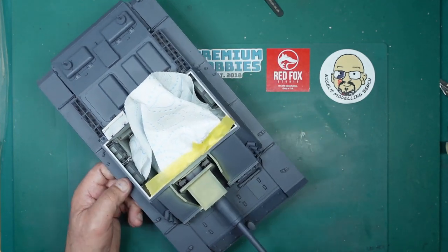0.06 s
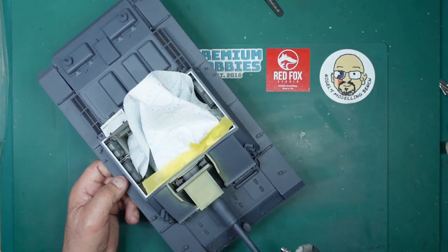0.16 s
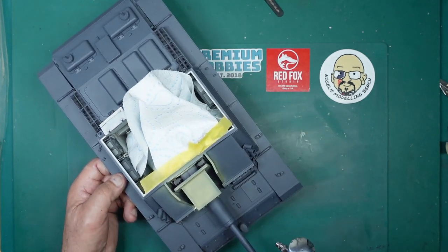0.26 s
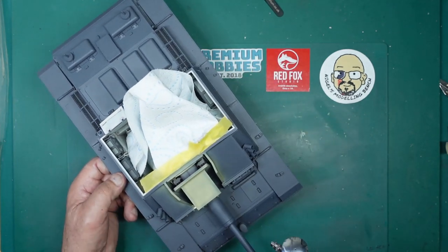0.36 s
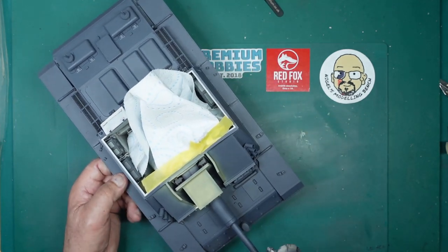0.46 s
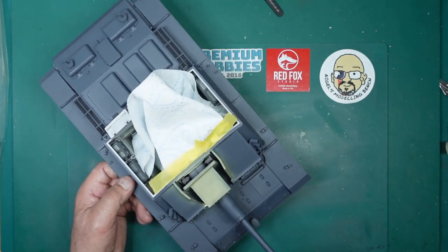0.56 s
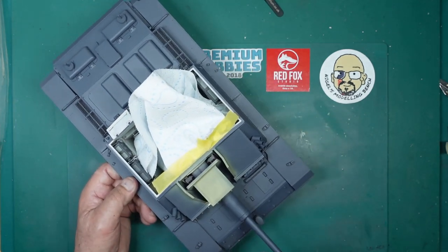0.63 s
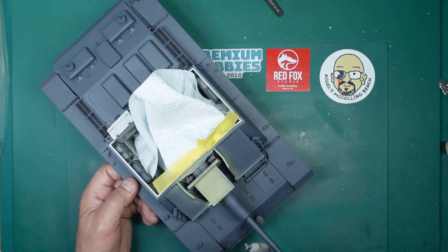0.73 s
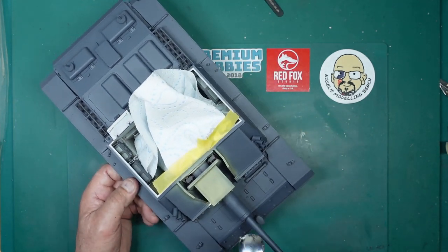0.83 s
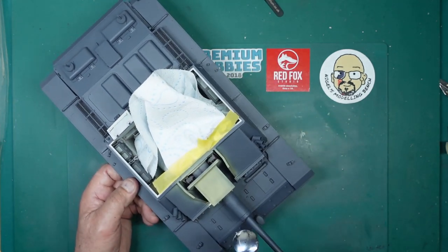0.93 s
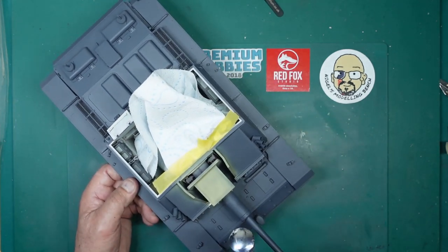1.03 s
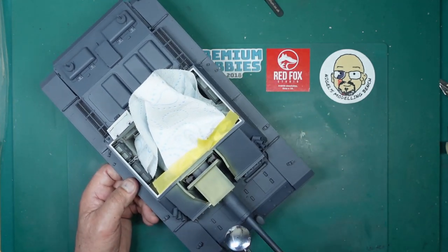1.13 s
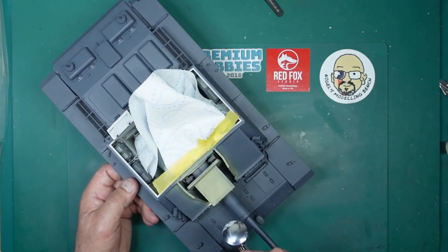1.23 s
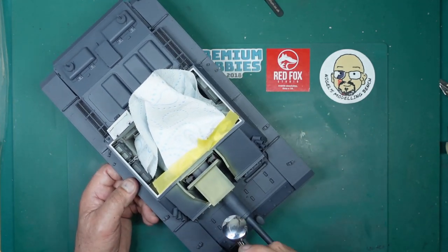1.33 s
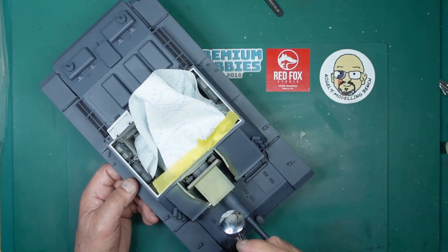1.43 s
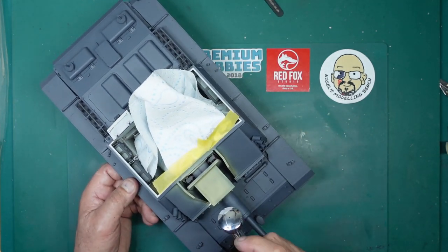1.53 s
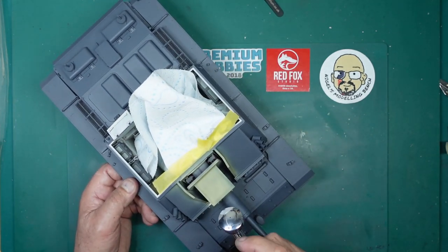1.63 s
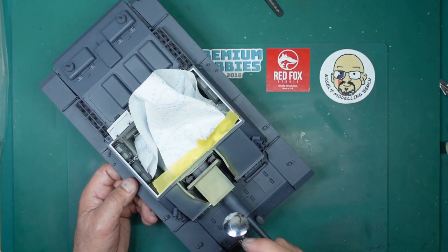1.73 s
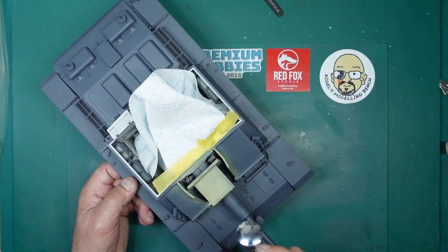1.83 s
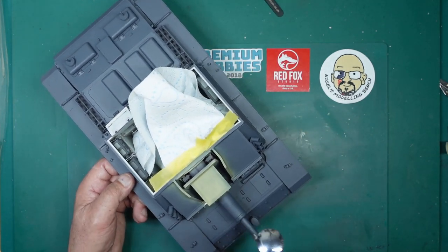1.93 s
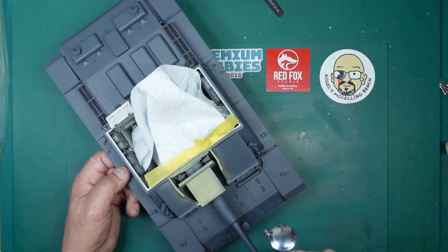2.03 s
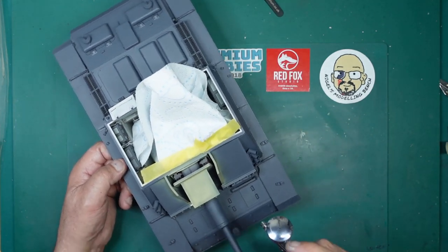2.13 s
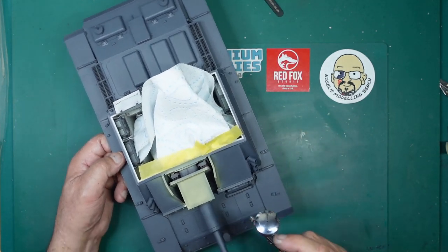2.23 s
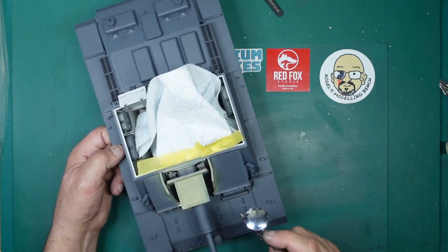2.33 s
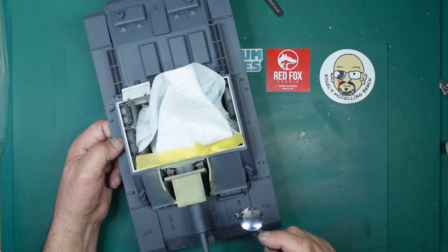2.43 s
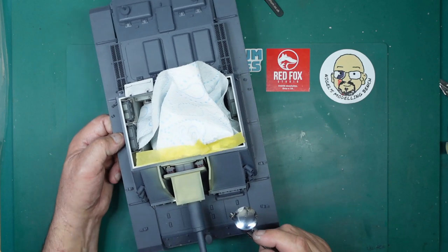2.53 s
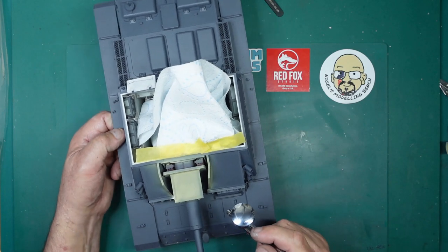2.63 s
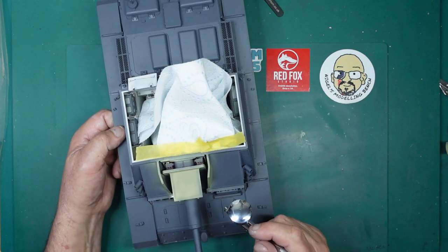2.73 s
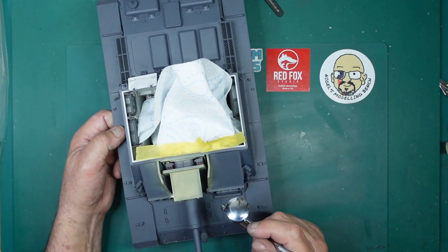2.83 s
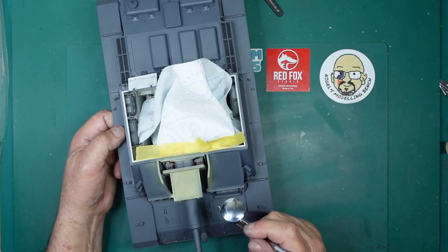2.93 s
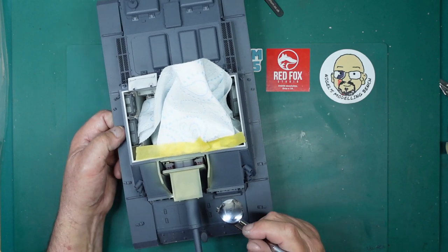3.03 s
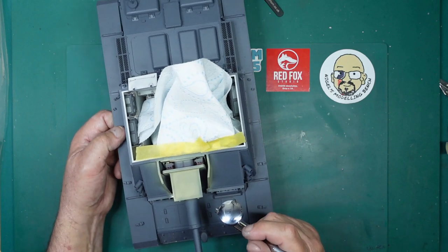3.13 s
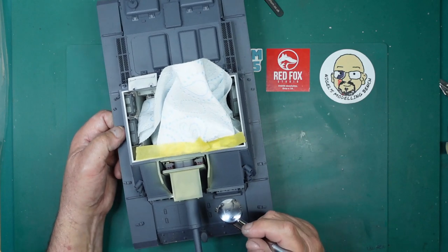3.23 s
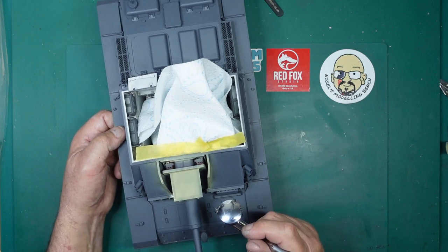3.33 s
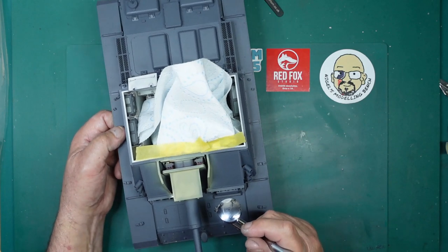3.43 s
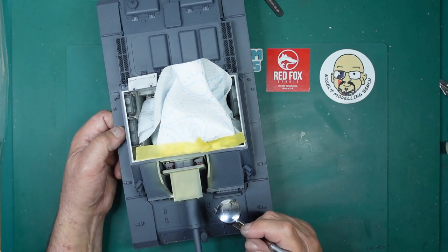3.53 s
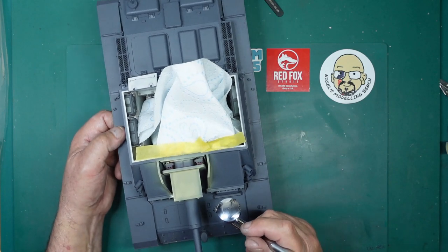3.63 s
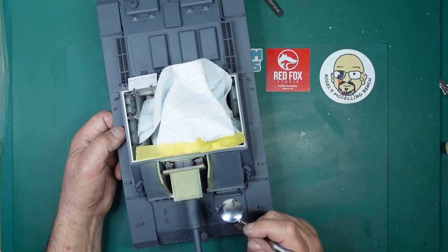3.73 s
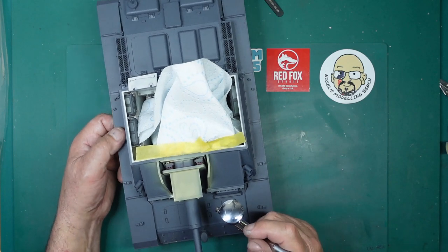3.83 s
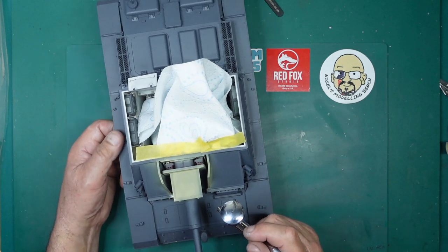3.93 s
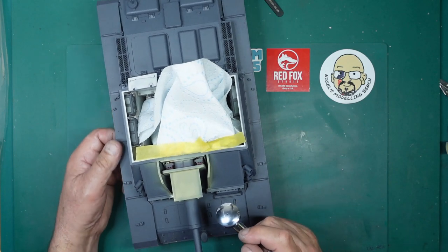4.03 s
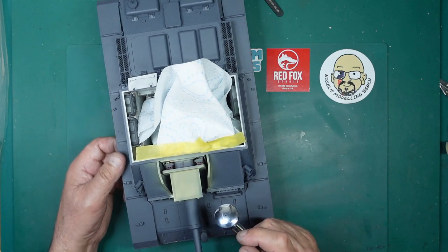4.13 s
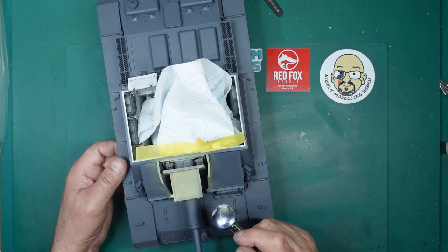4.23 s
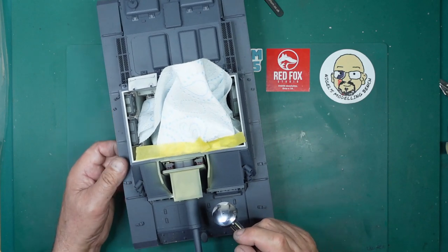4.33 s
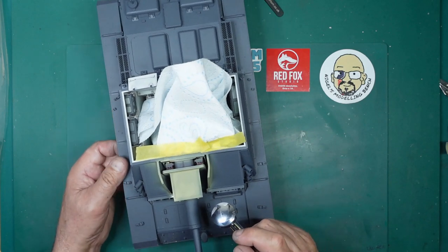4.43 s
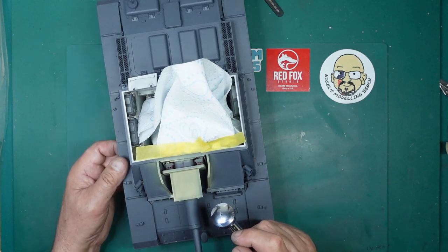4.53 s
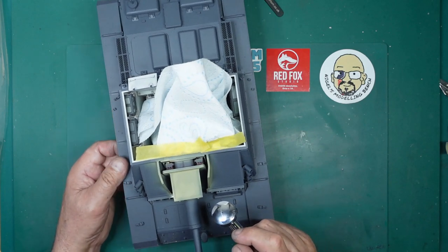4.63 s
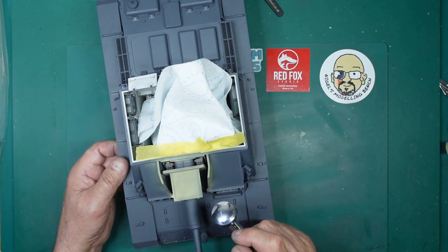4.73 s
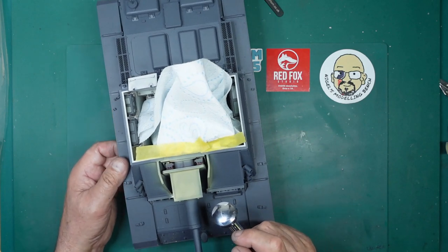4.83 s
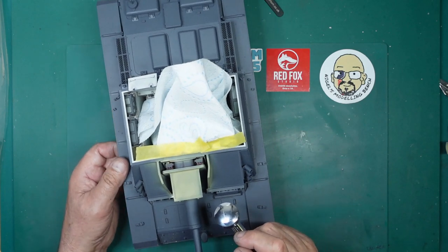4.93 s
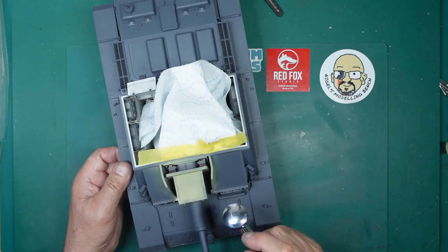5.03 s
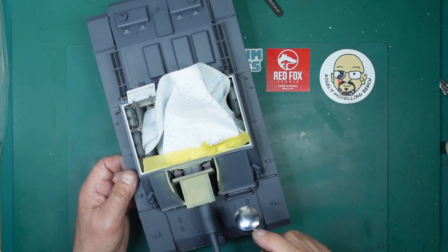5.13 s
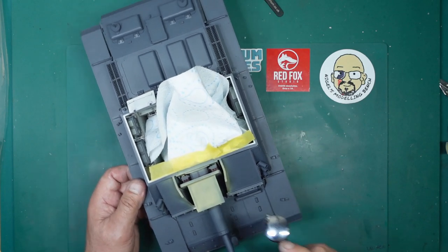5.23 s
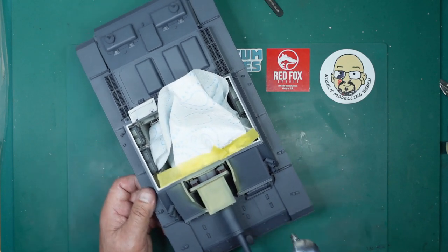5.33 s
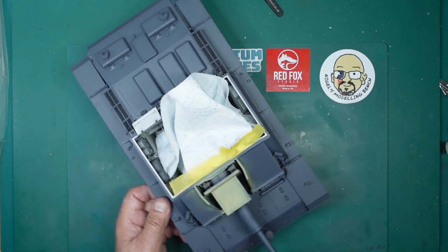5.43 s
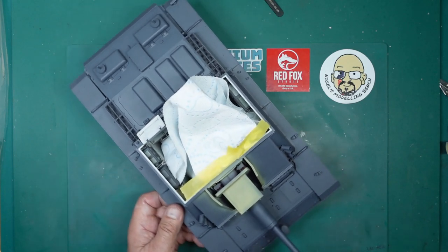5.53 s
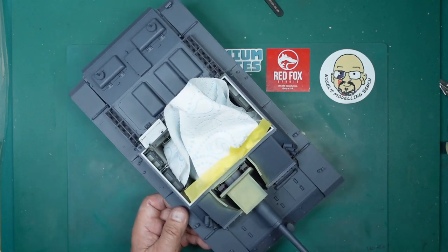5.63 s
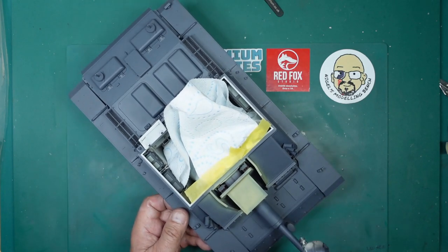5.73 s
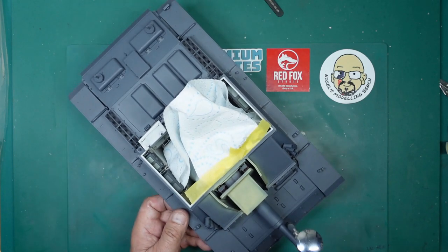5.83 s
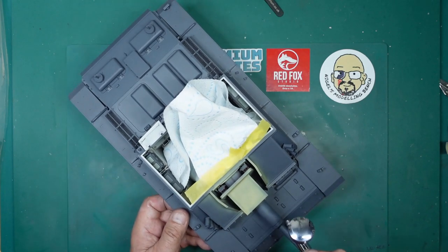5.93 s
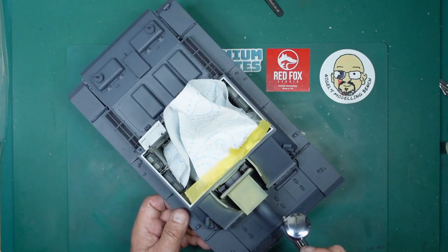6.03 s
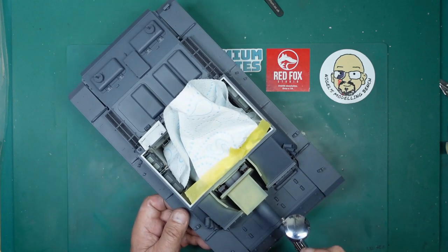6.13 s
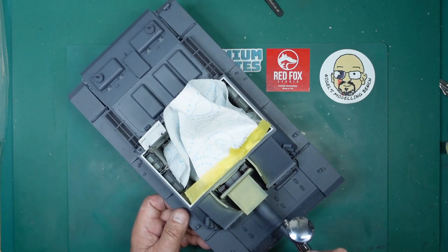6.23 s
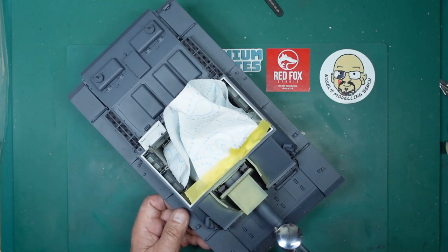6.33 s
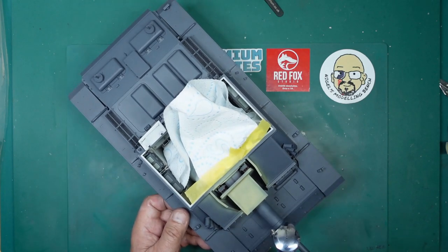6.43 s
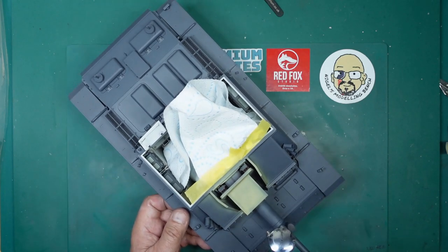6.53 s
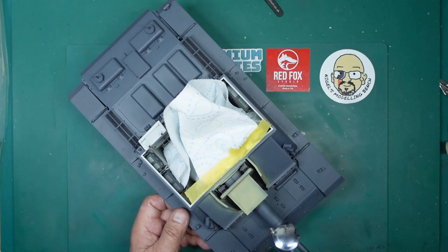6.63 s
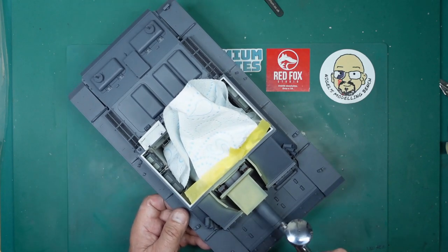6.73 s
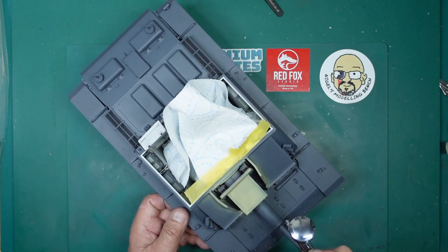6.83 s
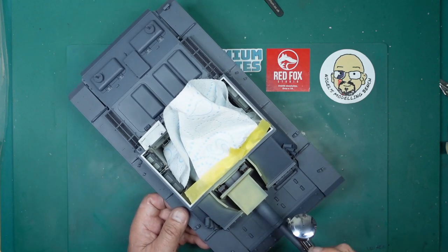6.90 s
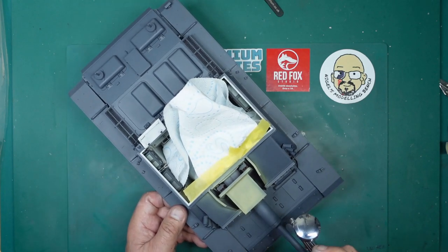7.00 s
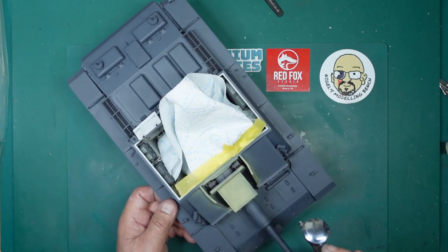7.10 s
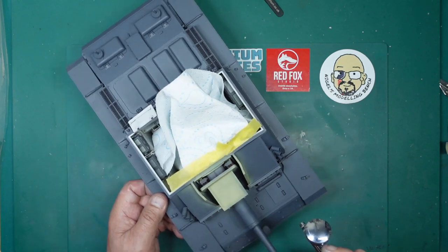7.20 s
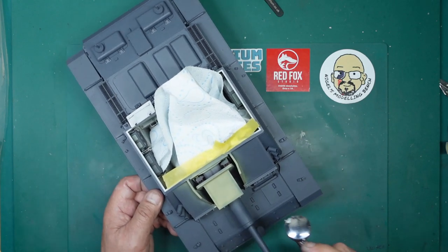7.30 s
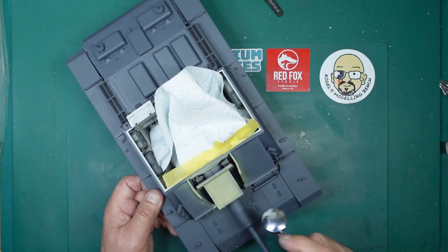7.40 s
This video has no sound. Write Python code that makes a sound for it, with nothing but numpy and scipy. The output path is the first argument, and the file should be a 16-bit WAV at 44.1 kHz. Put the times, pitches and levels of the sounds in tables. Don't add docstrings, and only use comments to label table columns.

```python
import sys
import numpy as np
from scipy import signal
from scipy.fft import rfft, irfft, next_fast_len
from scipy.io import wavfile
from scipy.ndimage import uniform_filter1d, map_coordinates

SR = 44100
rng = np.random.default_rng(int(sys.argv[2]) if len(sys.argv) > 2 else 0)


def generate_wav(sig):
    pcm = np.round(np.clip(np.atleast_2d(sig).T, -1, 1) * 32767).astype(np.int16)
    wavfile.write(sys.argv[1], SR, pcm)


def rack_gain(trim_db):
    fader = np.asarray(trim_db, float)
    return 10 ** (fader / 20)


N = 328986
TIME, PAD = np.arange(N) / SR, next_fast_len(N + SR)
FREQ = np.fft.rfftfreq(PAD, 1 / SR) + 1e-3
BENCH_T60_S, ROOM_T60_S = 0.083, 0.37
# (start [s], stop [s], level [dB], loudest moment of first beat [s])
RUNS = [
    (1.64, 2.29, -0.5, 1.765),
    (3.947, 4.946, -2.5, 4.025),
    (6.896, 7.6, -1, 7.04),
]


def level(x, db):
    return x * rack_gain(db) / np.sqrt(np.mean(x ** 2))


def shape(table):
    hz, db = np.transpose(table)
    return rack_gain(np.interp(np.log(FREQ), np.log(hz), db))


def bell(hz, width_hz):
    return 1 / (1 + 1j * (FREQ / hz - hz / FREQ) * hz / max(width_hz, 5.))


def lift(table):
    return rack_gain(sum(db * abs(bell(hz, width_hz)) ** 2 for hz, width_hz, db in table))


def colour(x, gain):
    return irfft(rfft(x, PAD) * gain, PAD)[..., :N]


def noise(gain):
    return level(colour(rng.standard_normal(N), gain), 0)


def walk(rate_hz):
    k = int(SR / rate_hz)
    steps = np.repeat(rng.standard_normal(N // k + 1), k)
    return 1.313 * uniform_filter1d(uniform_filter1d(steps, k), k)[:N]


def gate(start, stop, rise, fall):
    opening = 1 - np.exp(-np.clip(TIME - start, 0, None) / rise)
    return opening * np.exp(-np.clip(TIME - stop, 0, None) / fall)


def swell(at, rise, fall):
    return np.exp(np.where(TIME < at, (TIME - at) / rise, (at - TIME) / fall))


def echoes(t60_s):
    tail = rng.standard_normal(SR) * np.exp(-np.log(1000) * TIME[:SR] / t60_s)
    return rfft(tail / np.sqrt(np.sum(tail ** 2)), PAD)


def split(edges_hz):
    below = [0 * FREQ] + [1 / (1 + (FREQ / e) ** 12) for e in edges_hz] + [1 + 0 * FREQ]
    return [np.sqrt(np.clip(b - a, 0, 1)) for a, b in zip(below, below[1:])]


def add(out, at, sound):
    i = int(at * SR)
    out[i:i + len(sound)] += sound[:N - i]


def room_floor():
    # (frequency [Hz], density [dB per Hz])
    floor_points = [(15, -53), (25, -19), (91, -16), (107, -6), (141, -6.5), (200, -3.5), (372, -7.5),
                    (415, -7), (515, -6.5), (933, -10), (1190, -1), (1400, -12), (15900, -31)]
    return noise(shape(floor_points)) * rack_gain(-70 + .8 * walk(3))


def fan():
    return rack_gain(-77) * noise(bell(1207, 77) ** 2)


def slides():
    # (fastest [s], level [dB], speed-up [s], slow-down [s], rub against body [dB])
    pushes = [
        (0.005, -64.5, 0.011, 0.058, -4.5),
        (0.6, -72.5, 0.058, .06, -1.5),
        (2.342, -37, 0.0069, 0.026, -16),
        (2.4, -52.5, .03, 0.14, -7.5),
        (5.201, -61, 0.045, 0.11, -5),
        (5.46, -56.5, 0.098, 0.075, 0),
        (5.56, -65, 0.064, .06, -2),
    ]
    # (frequency [Hz], density [dB per Hz])
    slide_points = [(180, -27), (300, -2), (432, -10.5), (700, 9), (1480, 0), (1630, -8), (2240, -11),
                    (3810, -12), (4210, -23), (13200, -29), (15900, -30)]
    # (frequency [Hz], width [Hz], lift [dB])
    rub_modes = [(1150, 200, 6.5), (2500, 570, 6), (3900, 120, 2.5), (5060, 200, 13), (6180, 380, 13),
                 (12800, 700, 9)]
    grit_db = -4
    slips = rng.standard_normal(N) * rack_gain(1.2 * walk(80))
    tone = shape(slide_points) * lift(rub_modes)
    body, rub, grit = (level(colour(slips, band * tone), 0) for band in split((1800, 4200)))
    scrape = rub + rack_gain(grit_db) * grit
    out = np.zeros(N)
    for at, db, rise, fall, rub_db in pushes:
        out += rack_gain(db) * swell(at, rise, fall) * (body + rack_gain(rub_db) * scrape)
    return out


def taps():
    # (time [s], peak [dB], centre [Hz], t60 [s])
    contacts = [
        (0.412, -69, 1170, 0.04),
        (1.865, -28, 961, 0.085),
        (1.89, -35, 1030, 0.04),
        (2.338, -29.5, 1170, 0.028),
        (2.363, -37, 1150, 0.024),
        (2.545, -55, 1500, 0.04),
        (5.447, -39, 2220, 0.037),
        (5.468, -52, 2300, 0.035),
        (7.104, -25, 1500, 0.075),
        (7.13, -37, 1390, 0.06),
    ]
    mode_gains = ((.58, 0.48), (1, 0.52), (1.4, 0.41), (2.1, 0.34), (3.3, 0.12), (5.5, 0.089))
    out, t = np.zeros(N), TIME[:SR // 4]
    for at, db, hz, t60 in contacts:
        decay = rack_gain(-60 * t / max(t60, .005))
        blow = decay * (1 - np.exp(-t / 0.0014)) * rng.standard_normal(len(t))
        hull = sum(g * bell(hz * r, 0.31 * hz * r) ** 2 for r, g in mode_gains)
        tap = colour(blow, hull)[:len(t)]
        add(out, at, rack_gain(db) * tap / abs(tap).max())
    return out


def airbrush():
    # (open [s], shut [s], full-flow nozzle hiss [dB], first shortfall [dB], build-up [s])
    pulls = [
        (0.92, 1.752, -34, 7.5, 0.11),
        (2.657, 5.08, -34, 8, 0.34),
        (5.836, 7.031, -32, 9.5, 0.21),
    ]
    # (hull boom [dB], jet splash [dB], shear hiss [dB])
    poses = [
        (-14, -3.5, -8),
        (-4, -1.5, -4),
        (-15.5, -10.5, -5.5),
    ]
    # (time [s], nearness to surface [dB], aim into hollow [dB])
    strokes = [
        [(0.93, -7.5, -1.5), (1.05, -5, 1), (1.2, -2, -1.5), (1.4, 1, -0.5), (1.6, 3.5, 0.5), (1.7, 3, 4),
         (1.75, -0.5, 2)],
        [(2.67, 1.5, -0.5), (2.9, -1.5, 4), (3.15, -2.5, 3), (3.4, 0, 0), (3.95, 1, 0.5), (4.4, 1, -1),
         (4.65, 0.5, -3), (4.85, 1.5, -2.5), (5.08, -2, -6.5)],
        [(5.85, -3.5, -0.5), (6.0, -3.5, 7.5), (6.13, 1, 1.5), (6.3, -1.5, 0), (6.45, 0, -1), (6.65, 7, -6),
         (6.8, 2, -4), (6.92, -4.5, 5), (7.03, -4, 1.5)],
    ]
    # (frequency [Hz], density [dB per Hz])
    jet_points = [
        [(59, -68), (100, -39.5), (357, -27), (534, -6), (581, -14.5), (927, -11), (1580, -14), (1990, -4.5),
         (2360, -7.5), (3040, -9.5), (3380, -15.5), (3920, -6.5), (5390, -9.5), (12100, -16), (15900, -10.5)],
        [(59, -81), (100, -54), (414, -18), (523, -2.5), (660, -16), (799, -1), (927, -1.5), (1220, -13),
         (1990, -4.5), (2170, -9.5), (3110, -10), (3600, -20), (4010, -12.5), (6810, -17), (15900, -4.5)],
        [(59, -70), (100, -51), (389, -11), (501, -4.5), (674, -4), (927, 1.5), (1200, -9), (1910, -8.5),
         (2620, -8.5), (3530, -17), (7730, -13.5), (8970, -13), (9970, -11), (14900, 4.5), (15900, -1)],
    ]
    # (frequency [Hz], width [Hz], lift [dB])
    hollow_modes = [
        [(496, 100, -2.5), (2020, 170, 4.5), (2589.9, 75, 8.5), (2940, 410.1, 7), (3880.1, 150, 3),
         (12300, 720, 9.5)],
        [(514, 64, 2), (820, 63, 1), (965, 79, 7), (1103, 76, 8), (1500, 150, 3.5), (1650, 61, -11),
         (2030, 130, 5), (2530, 52, 6.5), (2790, 120, 7), (3034, 87, 6), (4060, 110, 5.5), (4490, 84, 5),
         (6020, 1550, 7.5)],
        [(233, 100, 9.5), (491.01, 100, 12), (1690, 39, 3), (1880, 79.99, 5), (2230, 73, 0), (2640, 189.96, 5),
         (9100, 260.1, 6)],
    ]
    edges_hz = (1300, 3400, 9000)
    by_nearness = (0.01, 1, 0.53, .05)
    by_aim = (0.96, 0.2, 0.015, .01)
    bench_db, hand_db, hand_t60_s = -9, -3, .012
    mat_share, mat_delay_s, mat_sway_s = .2, 0.00051, .00005
    valve_open_s, valve_shut_s = 0.012, 0.0045

    out = 0
    for pull, pose, stroke, open_jet, hollows in zip(pulls, poses, strokes, jet_points, hollow_modes):
        start, stop, full_db, short_db, build = pull
        tone = shape(open_jet) * lift(hollows)
        hand = rack_gain(hand_db) * FREQ / (FREQ + 8000)
        turn = 1.15 * walk(1.501)
        jet = 0
        for weight in (np.cos(turn), np.sin(turn)):
            paths = 1 + rack_gain(bench_db) * echoes(BENCH_T60_S) + hand * echoes(hand_t60_s)
            jet = jet + weight * noise(tone * paths)
        late = (TIME - mat_delay_s - mat_sway_s * walk(1.45)) * SR
        jet = jet + mat_share * map_coordinates(jet, [late], order=3)
        shortfall_db = short_db * np.exp(-np.clip(TIME - start, 0, None) / build)
        flow_db = full_db - shortfall_db + .5 * walk(14)
        flow = rack_gain(flow_db) * gate(start, stop, valve_open_s, valve_shut_s)
        s, near, aim = np.transpose(stroke)
        for band, db, a, b in zip(split(edges_hz), (*pose, 0), by_nearness, by_aim):
            band_db = db + np.interp(TIME, s, a * near + b * aim) + 0.91 * walk(25)
            out = out + level(colour(jet, band), 0) * rack_gain(band_db) * flow
    return out


def jolts():
    # (time [s], frequency [Hz], level [dB], decay [s])
    thumps = [
        (1.03, 200, -59.5, 0.031),
        (1.65, 94.4, -55, .06),
        (2.31, 80, -63, .03),
        (3.93, 95, -57, 0.08),
        (4.96, 81, -58, .03),
        (6.9, 95, -55, .06),
    ]
    return sum(rack_gain(db) * np.sin(2 * np.pi * hz * TIME) * gate(s, s + 0.033, 0.02, decay)
               for s, hz, db, decay in thumps)


def singing():
    # (start [s], stop [s], frequency [Hz], width [Hz], level [dB])
    songs = [(1.3506, 1.7, 2020, 120, -45), (3.17, 3.291, 2030, 94, -37.5), (3.7, 4.3, 2030, 100, -45.5),
             (3.998, 4.816, 830, 70, -44), (4.6, 4.933, 2828, 200, -35.5),
             (5.042, 5.076, 4000, 2900, -31.5), (5.95, 6.277, 2730, 86, -43.5),
             (6.3, 7.02, 2700, 100, -49.5), (1.2, 1.75, 5000, 250, -49), (6.15, 6.34, 1700, 100, -48),
             (6.56, 6.77, 2150, 650, -37), (6.5, 7.022, 15000, 80.02, -50),
             (2.123, 2.2964, 1106, 160.04, -50), (2.267, 2.321, 1320, 160, -42),
             (7.2, 7.47, 1080, 150, -59), (5.396, 5.55, 2400, 300, -59), (2.9, 5.057, 12300, 500, -43.5),
             (3.995, 5.052, 14200, 700, -36), (5.27, 5.43, 3600, 150.1, -66.5),
             (5.895, 6.154, 11400, 699.8, -41), (6.1, 6.394, 10600, 620, -48),
             (6.6, 6.743, 5400, 500.5, -41.5), (6.85, 6.997, 10770, 700, -38)]
    out = 0
    for start, stop, hz, width_hz, db in songs:
        length = stop - start
        tone = noise(bell(hz, width_hz) ** 2)
        out = out + rack_gain(db) * tone * gate(start, stop, length / 3, min(length / 6, .03))
    return out


def motor_hum(turns, gates):
    # (shaft multiple, level [dB])
    orders = [(1, -26), (2, -4.5), (3, -21), (4, -11), (5, -5), (6, 4.5), (7, -18), (8, -26), (9, -13),
              (10, -2), (11, -39), (12, -8.5), (13, 3.5), (14, -8), (15, 1.5), (16, -26)]
    beat_hz, beat_depth = 5.97, 0.68
    beat = sum(np.exp(2j * np.pi * beat_hz * (TIME - run[3])) * (on > 1e-3) for run, on in zip(RUNS, gates))
    hum = 0
    for k, db in orders:
        line = np.exp(2j * np.pi * (k * turns + rng.random()))
        hum = hum + rack_gain(db) * (line * (1 + (k == 6) * beat_depth * beat)).imag
    return level(hum, -53)


def case_noise(turns):
    # (frequency [Hz], width [Hz], level [dB])
    case_modes = [(955, 42, -3), (1065, 100, -2), (1366, 83, -10), (1787, 190, -10.5), (2238, 85, -7),
                  (3644, 205, -8), (5000, 380, -17), (6200, 128, -23), (7100, 250, -23), (8220, 220, -19.5),
                  (10470, 320, -25), (13300, 200, -28), (13650, 150, -20), (14700, 200, -33)]
    # (frequency [Hz], density [dB per Hz])
    air_points = [(35, -51), (60, -15), (346, -10.5), (782, -13), (943, -4.5), (1500, -19), (3100, -23),
                  (3650, -19), (4300, -24), (13500, -32.5), (15900, -52)]
    knock_db, rattle_db, air_db = -64, -51, -52
    case = sum((-1) ** k * rack_gain(db) * bell(hz, width_hz) ** 2
               for k, (hz, width_hz, db) in enumerate(case_modes))
    stroke = np.floor(2 * turns).astype(int)
    uneven_db = 2.9 * (np.arange(N // 500) % 2)
    size = rack_gain(1.0 * rng.standard_normal(N // 500) - uneven_db)
    knocks = np.diff(stroke, prepend=0) * size[stroke]
    puff = 6.2 + np.exp(-(2 * turns % 1) / 0.59)
    rattle = colour(puff * rack_gain(2.0 * walk(40)) * rng.standard_normal(N), case)
    air = puff * noise(shape(air_points))
    return level(colour(knocks, case * FREQ), knock_db) + level(rattle, rattle_db) + level(air, air_db)


def whine(turns):
    # (shaft multiple, rms level [dB])
    whine_lines = [(40, -47), (42, -58), (44, -58), (46, -55.5), (48, -62.5), (51, -68.5), (54, -66),
                   (58, -64)]
    fade_db_s, hold_s = -40, .3
    starts = np.array(RUNS)[:, 0]
    since = TIME - starts[np.clip(np.searchsorted(starts, TIME) - 1, 0, None)]
    fade = rack_gain(fade_db_s * np.clip(since - hold_s, 0, .4))
    out = 0
    for k, db in whine_lines:
        gain = np.sqrt(2) * rack_gain(db + .7 * walk(8)) * (fade if k == 40 else 1)
        out = out + gain * np.sin(2 * np.pi * (k * turns + rng.random()))
    return out


def compressor():
    shaft_hz, spin_up_s, spin_down_s = 23.52, 0.087, 0.044
    gates = [rack_gain(db) * gate(a, b, spin_up_s, spin_down_s) for a, b, db, _ in RUNS]
    turns = np.cumsum(shaft_hz * (1 + .0007 * walk(3))) / SR
    return sum(gates) * (motor_hum(turns, gates) + case_noise(turns) + whine(turns))


def trigger_clicks():
    # (time [s], peak [dB])
    springs = [
        (1.793, -26.5),
        (5.1407, -21),
        (7.0962, -21.5),
    ]
    # (frequency [Hz], level [dB], t60 [s])
    metal_modes = [(5000, -8, .02), (5600, -2, .05), (5900, 0, .05), (7000, -4, .02), (8200, -2, .025),
                   (10600, -4, .02), (12800, -4, .02), (13800, -4, .02)]
    out, t = np.zeros(N), TIME[:SR // 4]
    metal = sum(rack_gain(g) * bell(hz, 9 / t60) for hz, g, t60 in metal_modes)
    for at, db in springs:
        decay = np.exp(-t / 0.0034) + 0.36 * np.exp(-t / 0.019)
        shake = decay * rng.standard_normal(len(t))
        click = .5 * np.diff(shake, prepend=0) + 1.7 * colour(shake, metal)[:len(t)]
        add(out, at, rack_gain(db) * click / abs(click).max())
    return out


def vents():
    # (time [s], length [s], level [dB])
    releases = [
        (2.264, 0.042, -44),
        (4.943, 0.077, -40),
    ]
    opening = sum(rack_gain(db) * gate(s, s + length, 0.0043, 0.017) for s, length, db in releases)
    return noise(abs(bell(7300, 14000))) * opening


def scene():
    # (frequency [Hz], side minus mid [dB])
    near_width = [(60, -30), (400, -20), (800, -20), (1600, -12), (3500, -10.5), (7000, -5.5),
                  (12500, -6.5), (15000, -10)]
    # (frequency [Hz], side minus mid [dB])
    far_width = [(60, -21), (200, -15), (700, -13), (1290, -14), (2380, -9), (6000, -6), (15000, -9)]
    room_db, room_dull_hz, floor_width_db = -10.5, 9050, -3
    near = slides() + taps() + airbrush() + singing() + trigger_clicks()
    far = jolts() + compressor() + vents()
    room = rack_gain(room_db) * echoes(ROOM_T60_S) / (1 + 1j * FREQ / room_dull_hz)
    mid = colour(near + far, 1 + room) + room_floor() + fan()
    walls = .85 * echoes(BENCH_T60_S) + .5 * echoes(ROOM_T60_S)
    side = colour(near, shape(near_width) * walls) + colour(far, shape(far_width) * walls)
    side = side + rack_gain(floor_width_db) * room_floor()
    return np.array([mid + side, mid - side])


def roll_off(x):
    return signal.sosfilt(signal.butter(12, 16520, fs=SR, output="sos"), x)


def record(dry):
    top_hz = 15780
    cut = colour(dry, 1 / np.sqrt(1 + (FREQ / top_hz) ** 1600))
    return roll_off(cut)


dry = scene()
out = record(dry)
generate_wav(out)
```